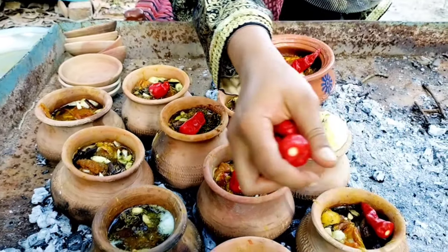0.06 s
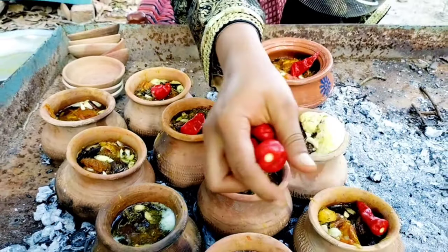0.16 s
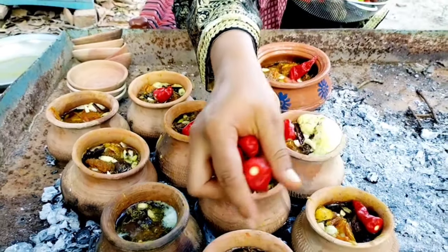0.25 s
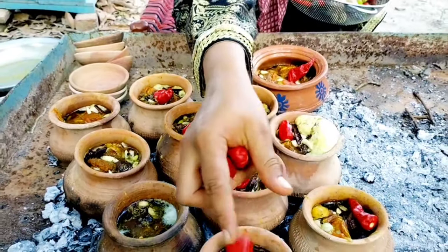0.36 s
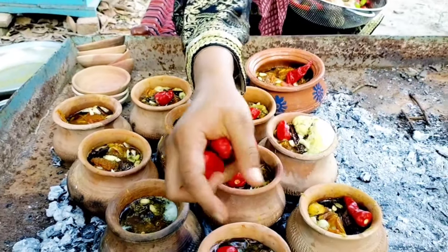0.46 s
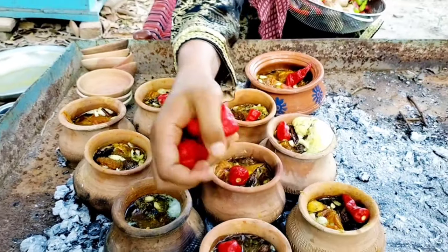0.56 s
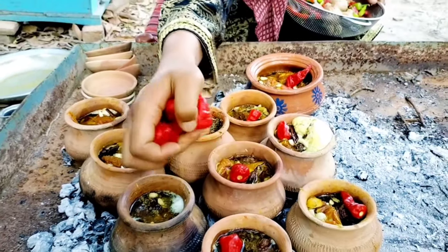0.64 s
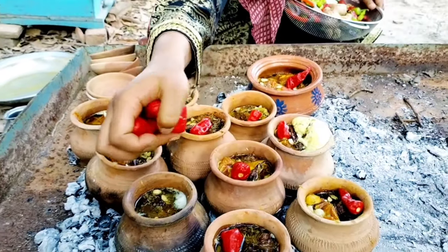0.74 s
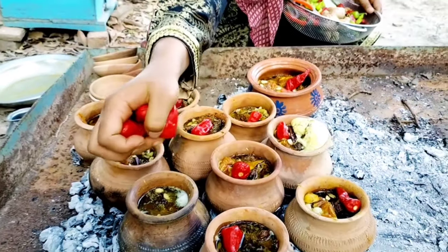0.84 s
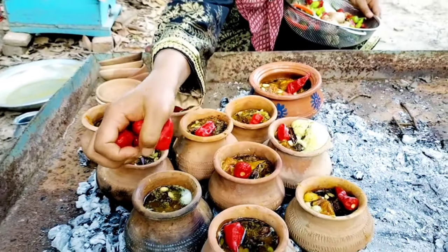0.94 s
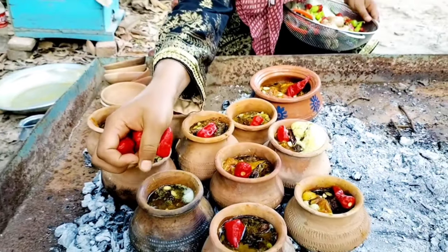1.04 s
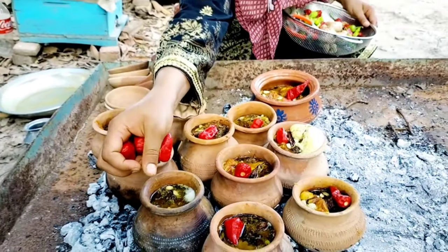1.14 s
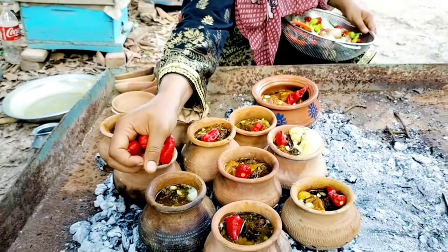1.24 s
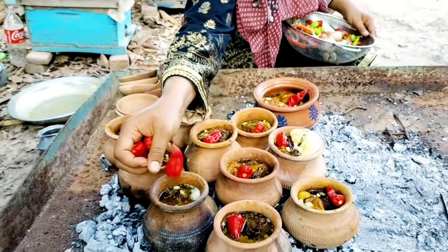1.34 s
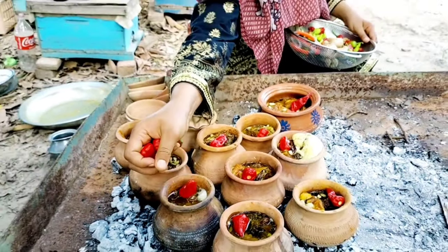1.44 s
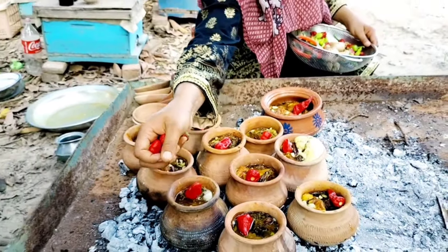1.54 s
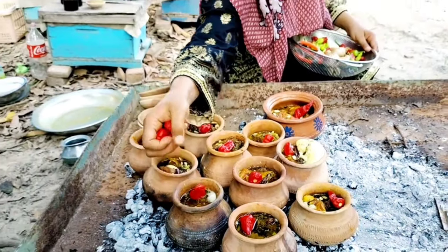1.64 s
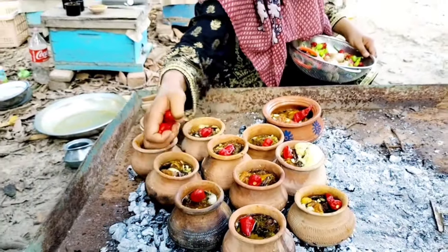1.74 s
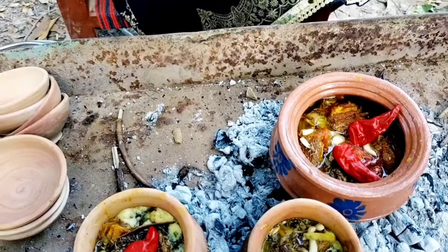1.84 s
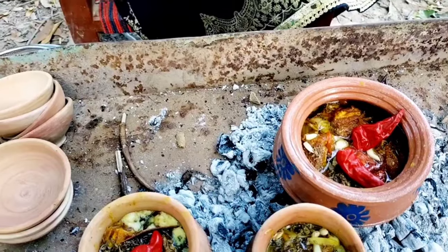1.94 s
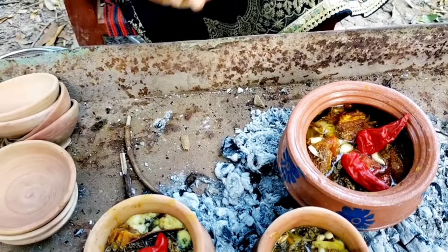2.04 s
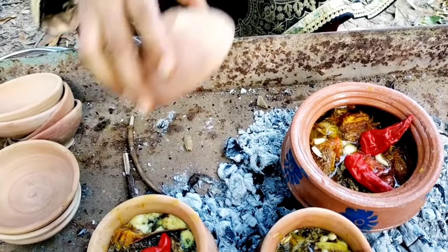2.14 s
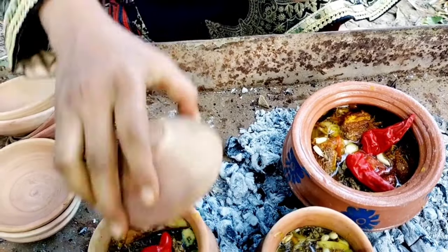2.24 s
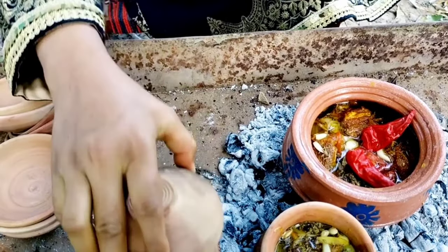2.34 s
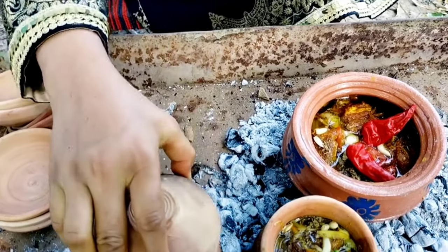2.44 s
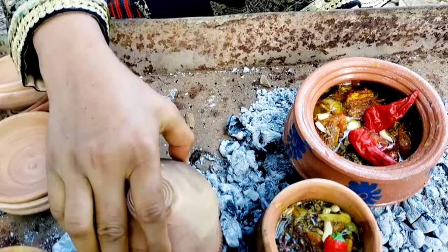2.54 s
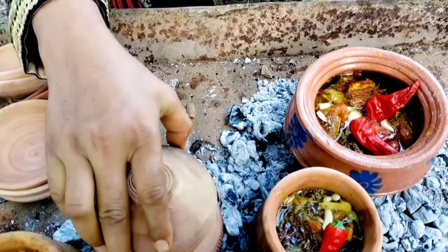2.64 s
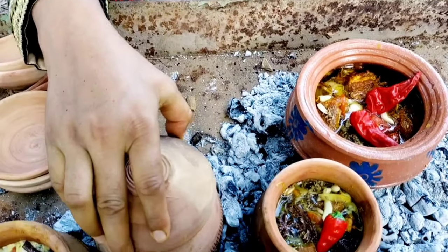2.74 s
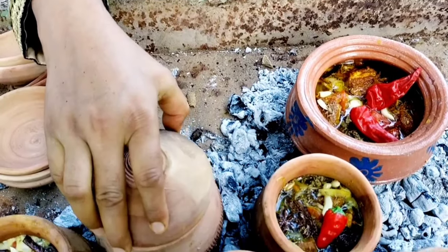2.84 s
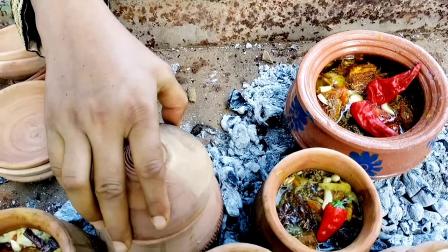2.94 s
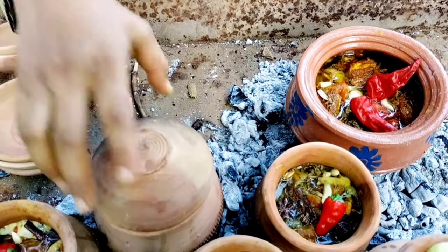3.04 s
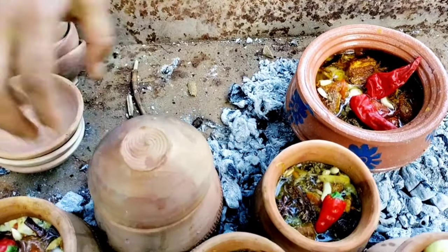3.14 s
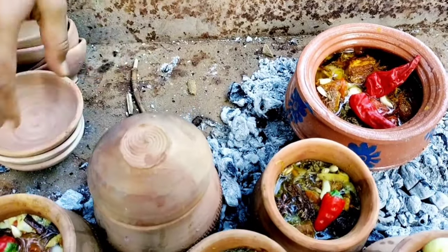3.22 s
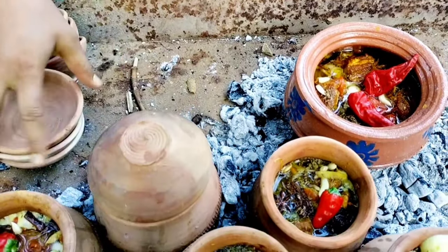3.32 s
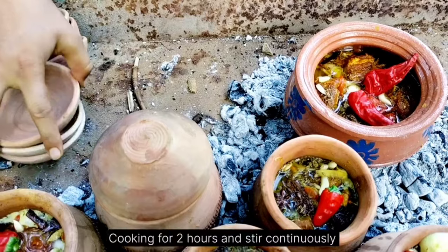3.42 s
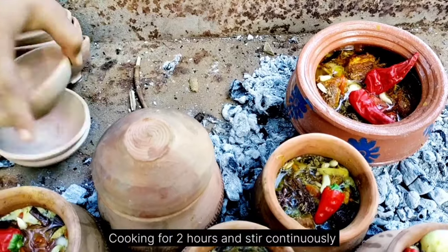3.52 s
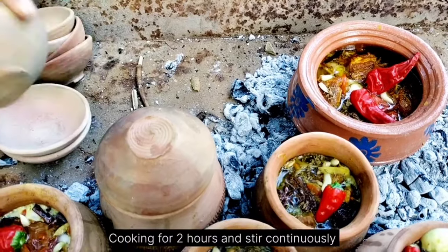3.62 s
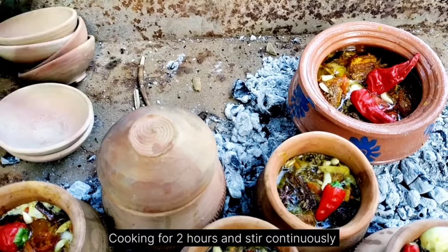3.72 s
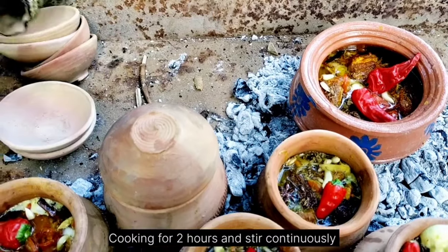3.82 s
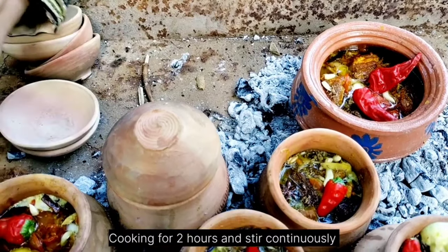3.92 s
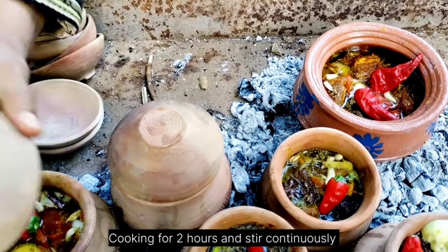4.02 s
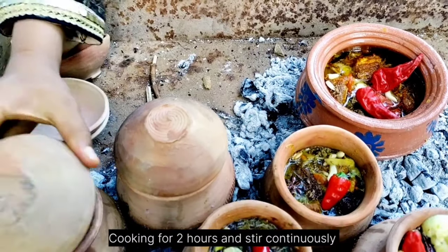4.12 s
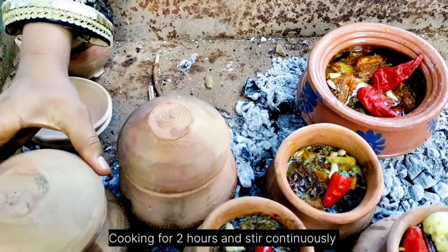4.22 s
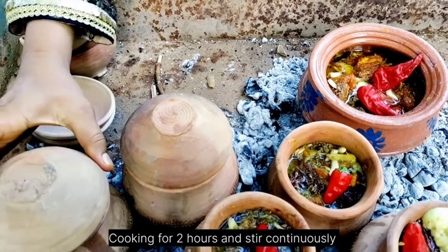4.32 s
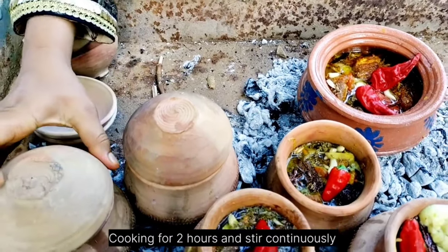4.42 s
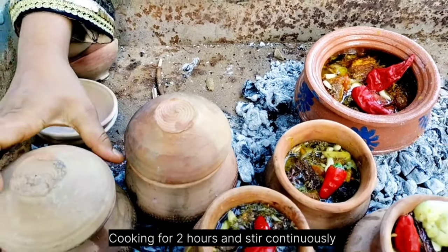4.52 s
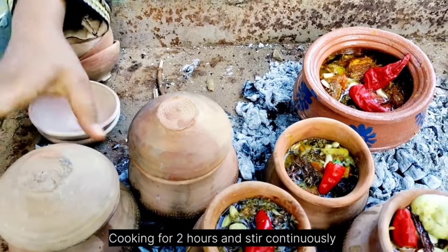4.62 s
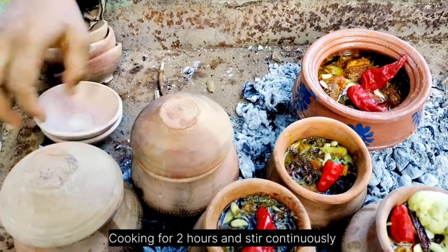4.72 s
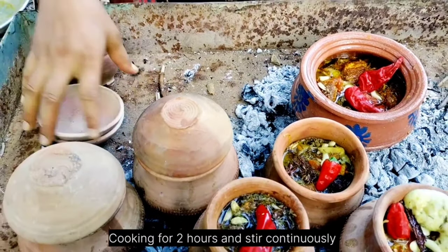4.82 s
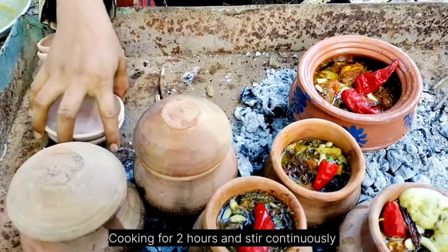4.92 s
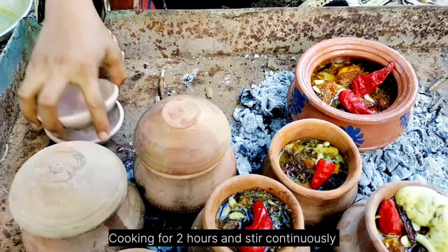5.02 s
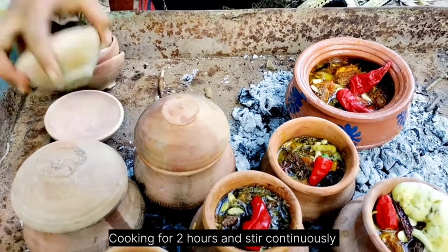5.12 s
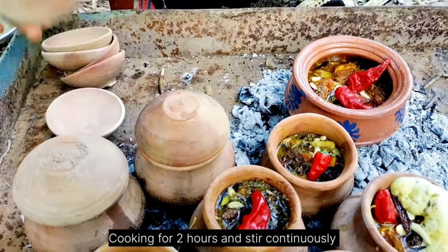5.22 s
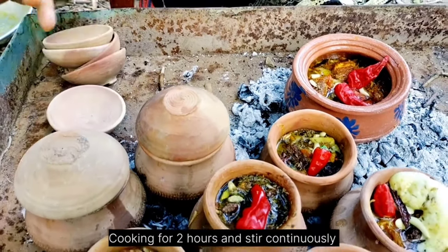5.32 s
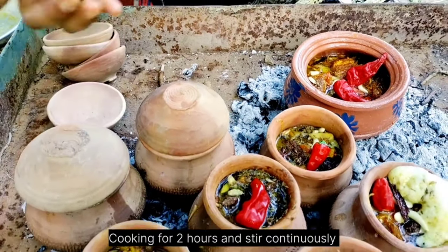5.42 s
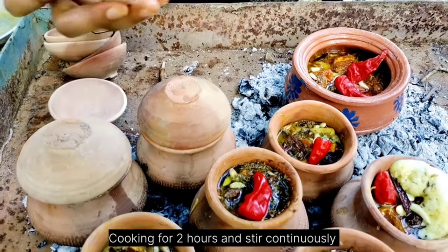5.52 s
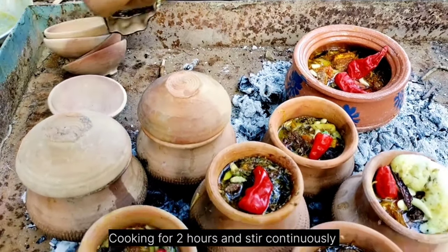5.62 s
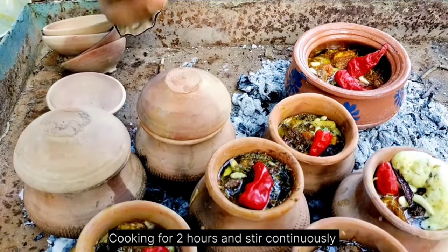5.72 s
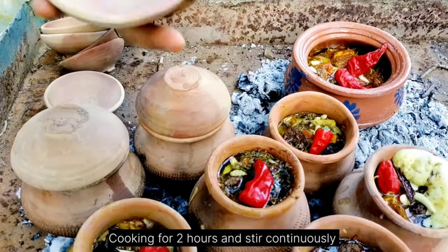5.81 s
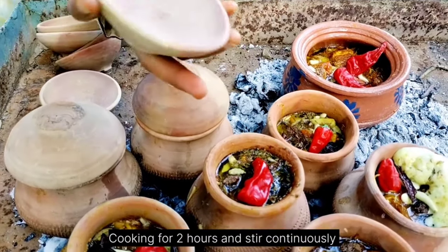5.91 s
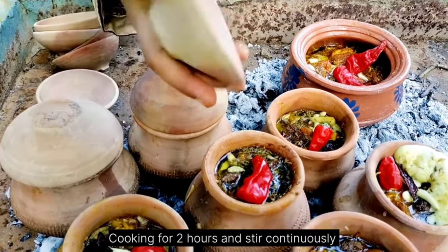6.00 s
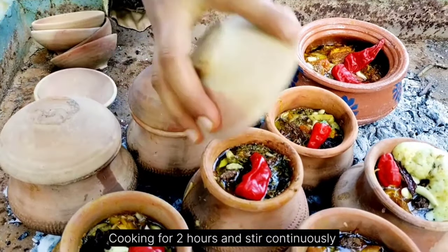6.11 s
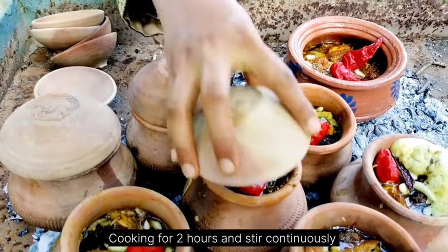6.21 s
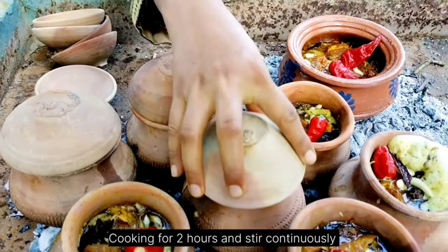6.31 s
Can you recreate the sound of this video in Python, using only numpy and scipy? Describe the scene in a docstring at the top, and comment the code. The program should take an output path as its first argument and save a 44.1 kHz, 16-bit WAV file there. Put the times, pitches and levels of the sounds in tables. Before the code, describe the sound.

Outdoors, a low hum and faint rustle run throughout. A bird chips and sings briefly on the right while fingers brush clay and tap lightly. A clay lid then knocks dully onto a pot, far birds whistle on the left, another lid grates off a stack and lands with a bright clink, wobbling to rest. An insect buzzes faintly before a last soft lift. Close stereo microphone.

```python
"""A low hum and far rustle run throughout; a bird at once chips on the right, then a dry tick snaps there.
Skin rubs on clay, far birds whistle on the left, an insect buzzes once. Clay lids are lifted from a stack
and set on pots outdoors near a two-port microphone: they clink, thud and grate. Clay is damped modes and
noise bursts, birds are gliding sines, a far engine is two wavering tones; the rest is shaped noise."""
import sys
import numpy as np
from scipy import signal
from scipy.fft import rfft, irfft, next_fast_len
from scipy.io import wavfile
from scipy.ndimage import uniform_filter1d, map_coordinates

SR = 44100
rng = np.random.default_rng(int(sys.argv[2]) if len(sys.argv) > 2 else 0)


def generate_wav(signal):
    """Clip the signal to [-1, 1] and save it as 16-bit WAV at the path in sys.argv[1]."""
    frames = np.transpose(np.atleast_2d(signal))
    scaled = np.clip(frames, -1, 1) * 32767
    pcm = np.round(scaled).astype(np.int16)
    wavfile.write(sys.argv[1], SR, pcm)


N = 280476

# background levels: t/s, rumble level/dB, hum level/dB, rustle and hiss level/dB
GROUND_LEVELS = [(0, -45.5, -39.5, -52.5), (3.75, -43, -36.5, -51), (6.36, -45.5, -37.5, -52.5)]
# relative noise densities, scaled to rms 1 in use: f/Hz, level/dB per Hz
RUMBLE_SPECTRUM = [(30, -52), (38, -14), (50, 17.5), (75, 19), (105, -32), (200, -86)]
HUM_SPECTRUM = [(60, -20.5), (102, -2.5), (125, -5.5), (170, -13), (350, -24.5), (1100, -43.5), (2000, -89)]
# rustle, with microphone hiss at the top end: f/Hz, level/dB per Hz
RUSTLE_SPECTRUM = [(290, -10.5), (500, -3.5), (1200, -7.5), (2180, -10), (2900, -15.5), (4480, -17.5),
                   (7630, -29.5), (9500, -35), (14000, -32.5)]
# likeness of the two ports in diffuse noise: f/Hz, likeness/1
PORT_LIKENESS = [(35, 0.62), (100, 0.99), (290, 0.8), (640, 0.25), (1200, 0.018)]
# yard decay before each source's own factor: f/Hz, t60/s
YARD_DECAY = [(200, 0.52), (2000, 0.53), (6000, 0.9), (12000, 0.027)]
# engine orders, before drift: mean f/Hz, level/dB
MOTOR_ORDERS = [(52, -48.5), (104, -42)]

# twitter from far trees, before a common trim: t/s, level/dB
FLOCK_LEVELS = [(0, -72), (1, -62), (1.5, -64), (2.55, -62.5), (2.7, -52.5), (3.1, -53.5), (3.5, -75),
                (4.75, -64.5), (4.93, -49.5), (5.1, -81), (5.3, -63), (5.6, -67), (6.36, -60)]
# notes of one chip: t/s after its start, length/s, start f/Hz, end f/Hz, relative level/dB
CHIP_NOTES = [(0, 0.029, 6460, 5270, -1), (0.017, 0.0112, 5440, 3930, -3.5)]
# song starts: t/s, level/dB, tilt/dB per octave above SONG_HZ (the bird turns away)
SONG_STARTS = [(.495, -43.5, -5), (1.095, -45, -8)]
# notes of the song: t/s after its start, length/s, start f/Hz, end f/Hz, relative level/dB
SONG_NOTES = [(0, 0.033, 3860, 3670, -11), (0.026, 0.014, 4180, 3490, -2), (0.045, 0.026, 4750, 4330, -1.5),
              (0.069, 0.0168, 6520, 5100, -2.5), (0.082, 0.0183, 5740, 5080, 4.5),
              (.106, 0.049, 4400, 4076, 0)]
# far whistles: t/s, length/s, start f/Hz, end f/Hz, level/dB
WHISTLES = [(0.79, 0.14, 2095, 2990, -64), (2.21, 0.031, 1610, 1470, -50.5),
            (2.35, 0.079, 2070, 2960, -57.5), (2.63, 0.17, 2803, 2800, -47), (2.86, 0.031, 3390, 3450, -47),
            (3.19, 0.073, 3080, 2930, -46.5), (3.19, 0.046, 2550, 2800, -48),
            (3.3, 0.05, 3320, 3480, -42.5), (5.11, 0.1, 1880, 1847, -59), (5.44, 0.038, 2510, 3170, -51),
            (5.48, 0.05, 3130, 3040, -55), (5.72, 0.08, 2525, 2740, -57), (6.07, 0.1, 3020, 2250, -58),
            (6.155, 0.087, 1995, 2540, -52.5), (6.24, 0.06, 2550, 2680, -56)]
# hoarse falling call: t/s, length/s, start f/Hz, end f/Hz, level/dB
HOARSE_CALL = [(5.19, 0.038, 4150, 3670, -56), (5.225, 0.052, 3736, 2660, -48.5),
               (5.285, .065, 3205, 2570, -48.5), (5.345, .066, 2780, 1606, -44)]
# short pips: t/s, length/s, start f/Hz, end f/Hz, level/dB
PIPS = [(4.885, 0.016, 2910, 2530, -42.5), (4.957, 0.014, 2680, 2810, -38)]
# short falling notes of one far bird: t/s, level/dB
DROPS = [(1.981, -52), (2.891, -43), (3.355, -39), (5.787, -52)]
# starts of a far two-note call: t/s, level/dB
PAIR_STARTS = [(5.47, -58.5), (5.725, -51), (5.985, -55)]
# its notes: t/s after its start, length/s, start f/Hz, end f/Hz, relative level/dB
PAIR_NOTES = [(0, 0.03, 3950, 3720, -2.5), (0.036, 0.0155, 4300, 3550, 0)]

# dry snaps, before port gains and filters: t/s, level/dB
TICKS = [(0.0826, -36.5), (1.586, -37.5), (1.694, -20), (3.12, -31.5), (3.955, -26), (4.491, -27),
         (5.6114, -30), (5.958, -28)]
# fingers sliding on clay, before port gains: t/s, length/s, level/dB
RUBS = [(0.138, 0.04, -53), (0.603, 0.03, -53), (1.275, 0.03, -58), (1.596, 0.15, -53),
        (2.545, 0.062, -49.5), (2.653, 0.1, -48.5), (2.874, 0.098, -47.5), (3.639, 0.032, -50),
        (4.281, 0.084, -45), (4.355, 0.238, -48.5), (4.642, 0.079, -53), (5.09, 0.031, -51.5),
        (5.252, 0.2, -51.5)]
# small taps straight ahead: t/s, level/dB, f/Hz
TAPS = [(0.704, -21, 1320), (0.863, -22, 1220), (5.957, -31, 1900)]
# a lid rocks on the stack as it is lifted: t/s, level/dB, first edge's lead/s, edge level/dB re main,
# rebound delay/s, rebound level/dB re main
ROCKS = [(3.673, -9, 0.024, -4, 0.014, -7.5), (3.759, -12.5, 0.007, -3, .021, -14),
         (5.195, -18, 0.024, -0.5, 0.0093, -5), (5.257, -15, 0.0139, -5.5, 0.05, -9.5)]
# modes of the stack on its steel tray: f/Hz, level/dB, t60/s
STACK_MODES = [(140, -24, 0.046), (189.8, 2, 0.088)]

# clay contacts: t/s, clink level/dB, knock f/Hz, hollow thud level/dB, lid ring and crack level/dB
CONTACTS = [(2.547, -28.5, 1120, -23, -53), (2.635, -12.5, 870, -6, -14), (2.813, -18.5, 755, -15, -52),
            (2.868, -32.5, 744, -24, -59), (3.569, -36, 930, -29, -30), (3.74, -24, 810, -14.5, -50),
            (4.2997, -4, 1200, -10.5, -13.5), (4.318, -15, 1030, -16.5, -21), (4.372, -27, 850, -21, -43),
            (4.391, -29, 796, -28, -55), (4.4389, -26, 674, -10, -24), (4.6672, -23.5, 455, -27, -24)]
# a faint soft onset, then the full knock: t/s after onset, level/dB re clink
KNOCK_ONSET = [(0, -15.5), (.003, 6.5)]
# lid modes, undamped by the hand: f/Hz, level/dB, t60/s
LID_MODES = [(1759, 6, 0.047), (2430, 0.5, 0.03), (3690, 0, 0.033)]
# duller first lid, undamped by the hand: f/Hz, level/dB, t60/s
FIRST_LID_MODES = [(1770, -1, 0.023), (1970, 2, 0.014), (2760, -1, 0.014), (3645, -3, 0.025),
                   (6220, -10.5, 0.013)]
# air modes in a pot: f/Hz, level/dB, t60/s
POT_MODES = [(202, 9.5, 0.033), (301, 1.5, 0.016), (504, -11, 0.043)]

TOP_HZ = 15830
BUZZ_S, BUZZ_LENGTH_S, BUZZ_RISE_S, BUZZ_FADE_S, BUZZ_DB = 4.823, 1.01, 0.084, 0.13, -60
CHIP_S, CHIP_EVERY_S, CHIP_DB = 0.046, 0.093, -53
SONG_HZ = 4280
DROP_LENGTH_S, DROP_FROM_HZ, DROP_TO_HZ = 0.0254, 2750, 2146
TICK_BODY_DB = -4.5  # before its filter, re snap
GRIND_DB = 17.5  # grit before its filter, re touch
FIRST_LID_UNTIL_S = 3
GRIP_DB, GRIPPED = -14.5, 0.13  # below this clink level the hand damps the lid; least share of ring time
CRACK_DB, CRACK_T60_S = 6.5, 0.016  # broad crack of rim on rim, re ring, before its filter
SETTLE_S, SETTLE_LENGTH_S, SETTLE_DB, SETTLE_HZ = 4.36, 0.16, -35, 590  # least level, centre pitch


def amp(db):
    """Gain of a level in dB."""
    return 10 ** (np.asarray(db) / 20)


def unit(x):
    """Scaled to rms 1."""
    return x / np.sqrt(np.mean(x ** 2) + 1e-20)


def along(points, hz):
    """(f/Hz, value) points interpolated on a log axis."""
    f, v = np.transpose(points)
    return np.interp(np.log(hz + 1), np.log(f + 1), v)


def curves(rows):
    """One value per sample for each column after the time; -120 outside."""
    s, *cols = np.transpose(rows)
    return [np.interp(np.arange(N) / SR, s, c, -120, -120) for c in cols]


def wobble(rate_hz):
    """A smooth random curve, rate_hz knots a second."""
    knots = rng.standard_normal(int(N * rate_hz / SR) + 4)
    return map_coordinates(knots, [np.arange(N) * rate_hz / SR])


def add_at(out, s, x):
    """Adds x into out from time s."""
    out[..., round(s * SR):][..., :x.shape[-1]] += x


def rising(t, rise_s):
    """Exponential onset with time constant rise_s."""
    return 1 - np.exp(-t / rise_s)


def filtered(x, response):
    """x times a complex response of frequency."""
    m = next_fast_len(N + SR // 4)
    return irfft(rfft(x, m) * response(np.fft.rfftfreq(m, 1 / SR)), m)[..., :N]


def band(lo_hz, hi_hz, order=2):
    """Causal band-pass response from cascaded one-pole slopes."""
    return lambda f: (1j * f / (lo_hz + 1j * f) * hi_hz / (hi_hz + 1j * f)) ** order


def rush(spectrum, patchy_db):
    """Stereo noise of rms 1, patchy in time and frequency, with the ports' likeness set by mid and side."""
    z = signal.stft(rng.standard_normal((2, N)), nperseg=512)[2]
    smooth = uniform_filter1d(rng.standard_normal(z.shape[1:]), 5, 0)
    field = uniform_filter1d(smooth, 10, 1)
    pair = signal.istft(z * amp(patchy_db * unit(field)), nperseg=512)[1][:, :N]

    def mid_side_gains(hz):
        turn = np.arccos(np.clip(along(PORT_LIKENESS, hz), -1, 1)) / 2
        return amp(along(spectrum, hz)) * [np.cos(turn), np.sin(turn)]

    mid, side = filtered(pair, mid_side_gains)
    return unit(np.array([mid + side, mid - side]))


def placed(x, lead_s, wet_db, far):
    """The left port leads the right by lead_s; each port gets its own noise tail, its decay scaled by far."""
    hz, t, z = signal.stft(rng.standard_normal((2, SR // 2)), SR, nperseg=256)
    decay = amp(-60 * t / (far * along(YARD_DECAY, hz)[:, None]))
    tail = signal.istft(z * decay, SR, nperseg=256)[1]
    wet = signal.fftconvolve(x[None], tail / np.linalg.norm(tail[0]), axes=1)[:, :N]
    ports = np.array([[1], [-1]])
    direct = filtered(x, lambda f: np.exp(1j * np.pi * f * lead_s * ports))
    return direct + amp(wet_db) * wet


def ground():
    """Rumble, broad-peaked hum, rustle of far leaves and chatter with faint microphone hiss: shaped noise."""
    rumble_db, hum_db, rustle_db = curves(GROUND_LEVELS)
    rumble = amp(rumble_db) * rush(RUMBLE_SPECTRUM, patchy_db=3.0)
    hum = amp(hum_db) * rush(HUM_SPECTRUM, patchy_db=0.7)
    rustle_and_hiss = amp(rustle_db) * rush(RUSTLE_SPECTRUM, patchy_db=2.5)
    return rumble + hum + rustle_and_hiss * amp([[-1.2], [1.2]])


def motor():
    """Two orders of a far engine share one drifting speed; each wavers in level."""
    turns = np.cumsum(1 + 0.0365 * wobble(5)) / SR
    return sum(amp(db + 4.5 * wobble(2.27)) * np.sin(2 * np.pi * hz * turns) for hz, db in MOTOR_ORDERS)


def insect():
    """A fuzzy buzz: noise in one narrow band, swelling unevenly."""
    since = np.arange(N) / SR - BUZZ_S
    buzz = rush([(5200, -26.0), (6200, -8.5), (7250, -14.5), (7500, -33)], patchy_db=2.0)
    rise, fade = since / BUZZ_RISE_S, (BUZZ_LENGTH_S - since) / BUZZ_FADE_S
    level = np.clip(np.minimum(rise, fade), 0, 1)
    return amp(BUZZ_DB + 0.8 * wobble(6)) * level * buzz


def whistle(notes, rough_db, waver, rate_hz=140):
    """Gliding sine notes with soft ends, fluttering in level and pitch."""
    out, drift = np.zeros(N + SR), 1 + waver * wobble(90)
    for s, length_s, from_hz, to_hz, db in notes:
        u = np.linspace(0, 1, round(length_s * SR))
        note_drift = drift[min(round(s * SR), N - len(u)):][:len(u)]
        hz = (from_hz + (to_hz - from_hz) * u) * note_drift
        phase = 2 * np.pi * np.cumsum(hz) / SR
        add_at(out, s, amp(db + 3) * np.sin(np.pi * u) ** 0.7 * np.sin(phase))
    return out[:N] * amp(rough_db * wobble(rate_hz))


def flock(count=2500):
    """Many short chirps from far trees blur into a haze."""
    s, length, pitch, glide, size = rng.random((count, 5)).T
    from_hz = 1900 * 2.4 ** pitch ** 1.4
    to_hz = from_hz * (0.7 + 0.5 * glide)
    notes = np.transpose([s * N / SR, 0.004 + 0.008 * length, from_hz, to_hz, 4 * size])
    return unit(whistle(notes, rough_db=2.0, waver=0.022)) * amp(curves(FLOCK_LEVELS)[0] - 2.5)


def sung(starts, shape):
    """Repeats the notes of a call at each (t/s, level/dB, tilt/dB per octave above SONG_HZ) start."""
    return [(s + after_s, length_s, from_hz, to_hz, db + note_db + tilt_db * np.log2(from_hz / SONG_HZ))
            for s, db, tilt_db in starts
            for after_s, length_s, from_hz, to_hz, note_db in shape]


def birds(count=4):
    """One bird on the right chips at an even pace and sings; far birds on the left whistle and twitter."""
    chip_starts = [(CHIP_S + k * CHIP_EVERY_S, CHIP_DB, 0) for k in range(count)]
    near_notes = sung(chip_starts, CHIP_NOTES) + sung(SONG_STARTS, SONG_NOTES)
    near = whistle(near_notes, rough_db=4, waver=0.0232, rate_hz=310)
    hoarse = whistle(HOARSE_CALL, rough_db=5.0, waver=0.031, rate_hz=470)
    clear = whistle(WHISTLES, rough_db=3.5, waver=0.0143)
    drops = [(s, DROP_LENGTH_S, DROP_FROM_HZ, DROP_TO_HZ, db) for s, db in DROPS]
    pairs = sung([(s, db, 0) for s, db in PAIR_STARTS], PAIR_NOTES)
    short = whistle(drops + PIPS + pairs, rough_db=3.5, waver=0.0053)
    return (placed(near, lead_s=-0.000501, wet_db=-4.5, far=0.6)
            + placed(hoarse + flock(), lead_s=0.000362, wet_db=1.5, far=0.53)
            + placed(clear, lead_s=0.00044, wet_db=-3, far=0.43)
            + placed(short, lead_s=0.00042, wet_db=-3.5, far=0.29))


def ticks():
    """Dry snaps a few milliseconds long: decaying noise, bright with a duller body, close to the right port."""
    top, body, t = np.zeros((2, N + SR)), np.zeros((2, N + SR)), np.arange(SR // 40) / SR
    for s, db in TICKS:
        envelope = amp(db - 60 * t / 0.014) * rising(t, 0.0014)
        snap = envelope * rng.standard_normal((2, len(t))) * amp([[-6], [6]])
        add_at(top, s, snap)
        add_at(body, s, amp(TICK_BODY_DB) * snap)
    return filtered(top[:, :N], band(11200, 19000)) + filtered(body[:, :N], band(2500, 5000))


def rubbing():
    """Skin on rough clay: clumped grit, swelling and fading with each slide, louder on the right."""
    level = np.zeros(N + SR)
    for s, length_s, db in RUBS:
        half_turn = np.linspace(0, np.pi, round(length_s * SR))
        add_at(level, s, amp(db) * np.sin(half_turn) ** 0.26)
    grit = rush([(1200, 7), (2600, 8.0), (7000, -3.5), (13000, -11.5), (15800, -19)], patchy_db=2.5)
    return level[:N] * amp(1.8 * wobble(89)) * grit * amp([[-2.5], [2.5]])


def taps():
    """Light dry knocks: a fast-decaying tone under a crisp noise click."""
    out, t = np.zeros(N + SR), np.arange(SR // 20) / SR
    for s, db, hz in TAPS:
        click = amp(-3 - 60 * t / 0.0046) * rng.standard_normal(len(t))
        tone = amp(-60 * t / 0.0063) * np.sin(2 * np.pi * hz * t)
        add_at(out, s, amp(db) * rising(t, 0.00046) * (tone + click))
    return placed(filtered(out[:N], band(300, 4400)), lead_s=0, wet_db=-3.5, far=0.18)


def ring(modes, t, spread_db):
    """Damped modes, struck at new strengths."""
    return sum(amp(db + rng.normal(0, spread_db) - 60 * t / t60) * np.sin(2 * np.pi * hz * t)
               for hz, db, t60 in modes)


def stack():
    """Soft, heavy touches, each rock in three: low modes, and grit grinding between the rims."""
    low, grit, t = np.zeros(N + SR), np.zeros(N + SR), np.arange(SR // 5) / SR
    rise = rising(t, 0.0018)
    for main_s, main_db, lead_s, edge_db, back_s, back_db in ROCKS:
        edge = (main_s - lead_s, main_db + edge_db)
        rebound = (main_s + back_s, main_db + back_db)
        for s, db in [edge, (main_s, main_db), rebound]:
            low[round(s * SR):][:len(t)] *= 1 - rise  # a new touch stops the last ring
            add_at(low, s, rise * amp(db) * ring(STACK_MODES, t, spread_db=1.0))
            grind = amp(db + GRIND_DB - 60 * t / 0.21) * rng.standard_normal(len(t))
            add_at(grit, s, rise * grind)
    mixed = low[:N] + filtered(grit[:N], band(275, 307, order=3))
    return placed(mixed, lead_s=0.00026, wet_db=-40.0, far=0.32)


def knock(hz, t):
    """A dead blow: one short tone and a noise burst spanning 0.15 to 1.59 times its pitch."""
    b, a = signal.butter(3, [0.15 * hz, 1.59 * hz], "bandpass", fs=SR)
    burst = signal.lfilter(b, a, rng.standard_normal(len(t)))
    return amp(-60 * t / 0.017) * np.sin(2 * np.pi * hz * t) + amp(7.0 - 60 * t / 0.012) * burst


def settling(pot, t, rise, count=26):
    """A lid wobbles to rest in small random touches, added to the pot signal."""
    for when, size, pitch in rng.random((count, 3)):
        blow = knock(SETTLE_HZ * (0.8 + 0.4 * pitch), t) + 0.47 * ring(POT_MODES, t, spread_db=3.0)
        add_at(pot, SETTLE_S + SETTLE_LENGTH_S * when, rise * amp(SETTLE_DB + 10.4 * size) * blow)


def clay():
    """Each contact: a knock at the touching rim, the hollow thud of the pot, the ring and crack of the lid."""
    pot, lid, crack, t = np.zeros(N + SR), np.zeros(N + SR), np.zeros(N + SR), np.arange(SR // 5) / SR
    rise = rising(t, 0.0011)
    for s, db, knock_hz, thud_db, ring_db in CONTACTS:
        onset_s = s - KNOCK_ONSET[1][0]  # the full knock falls at s
        for late_s, part_db in KNOCK_ONSET:
            add_at(pot, onset_s + late_s, rise * amp(db + part_db) * knock(knock_hz, t))
        add_at(pot, s, rising(t, 0.0052) * amp(thud_db) * ring(POT_MODES, t, spread_db=1.5))
        free = np.clip(amp(db - GRIP_DB), GRIPPED, 1)  # 1: undamped by the hand
        damping = free ** 2 * amp(ring_db - 60 * t * (1 / free - 1) / LID_MODES[0][2])
        modes = FIRST_LID_MODES if s < FIRST_LID_UNTIL_S else LID_MODES
        add_at(lid, s, rise * damping * ring(modes, t, spread_db=1.5))
        crack_level = amp(ring_db + CRACK_DB - 60 * t / CRACK_T60_S)
        add_at(crack, s, rise * crack_level * rng.standard_normal(len(t)))
    settling(pot, t, rise)
    bright = lid[:N] + filtered(crack[:N], band(540, 3000))
    return (placed(pot[:N], lead_s=0.00027, wet_db=-11.5, far=0.18)
            + placed(bright, lead_s=0.000465, wet_db=-4, far=0.089))


def scene():
    """All sources at the two ports."""
    return ground() + motor() + insect() + birds() + ticks() + rubbing() + taps() + stack() + clay()


def record(dry):
    """Nothing is kept from the band limit up."""
    return filtered(dry, lambda hz: hz < TOP_HZ)


dry = scene()
out = record(dry)
generate_wav(out)
```